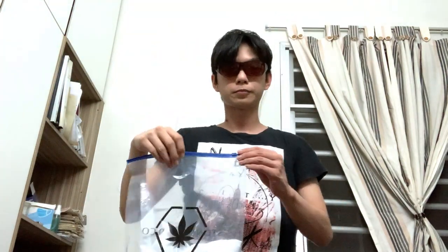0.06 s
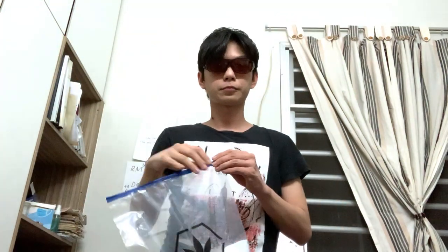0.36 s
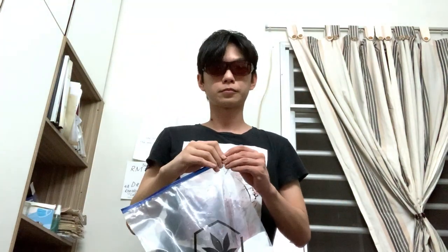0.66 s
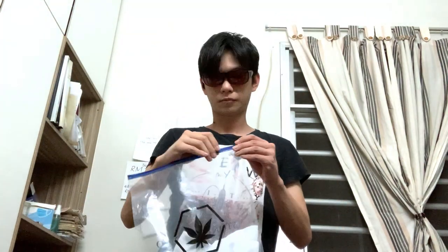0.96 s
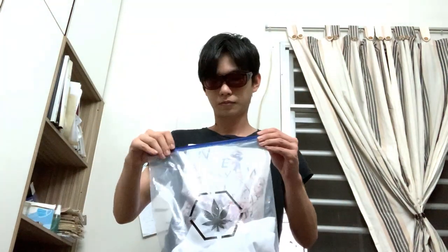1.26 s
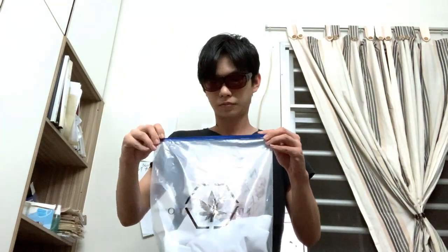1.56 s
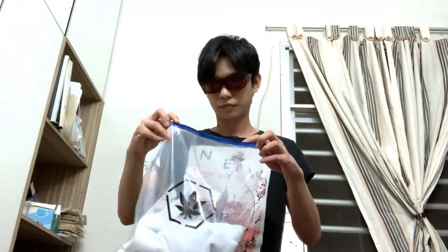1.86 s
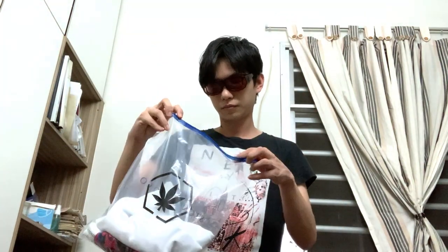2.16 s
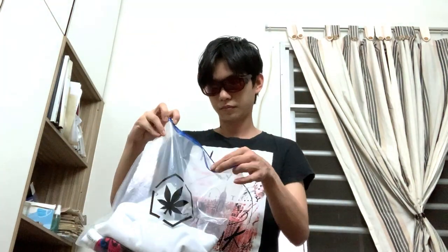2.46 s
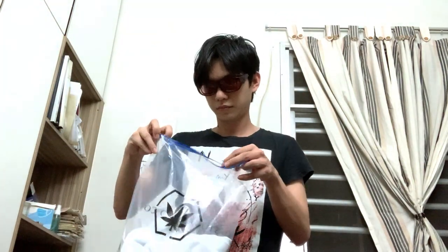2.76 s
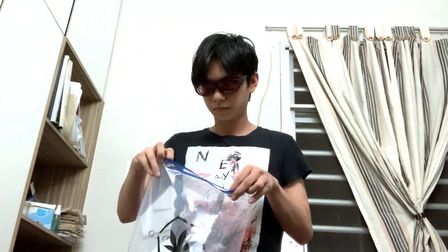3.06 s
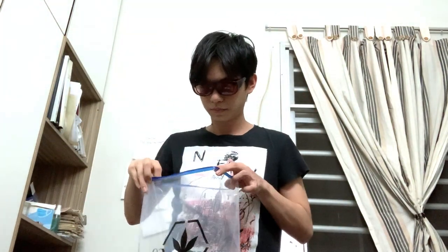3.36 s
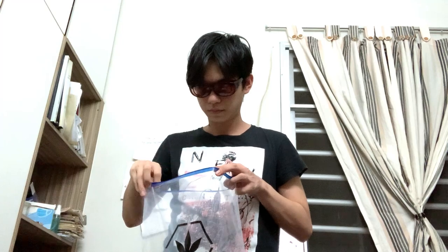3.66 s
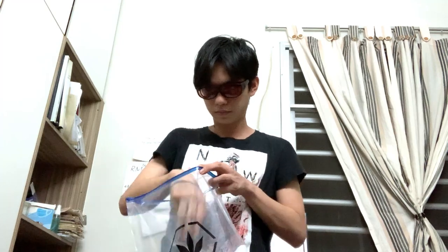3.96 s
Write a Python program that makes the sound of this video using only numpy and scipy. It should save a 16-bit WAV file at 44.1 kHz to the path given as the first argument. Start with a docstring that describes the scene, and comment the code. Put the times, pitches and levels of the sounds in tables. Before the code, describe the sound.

A large plastic zip bag crinkles close by, starting with a dull rustle and a soft puff of air. From 1 to 1.4 seconds, fingers slide along the zip with a faint hiss and two small squeaks. Scattered snaps thicken into brighter crackling from 2.4 seconds. At about 3.2 seconds the seal parts in a short, stuttering rip, followed by a few more crinkles over faint room hum.

```python
"""A large plastic zip bag, handled close to a stereo microphone in a small, quiet room.
The film crumples in bursts of tiny buckles, single creases snap, and the bag swings with a puff of air.
Fingers slide along the zip with a hiss and two squeaks; then the seal is pulled apart in quick slips,
a short, stuttering rip. Low room rumble and mains hum lie underneath."""
import sys
import numpy as np
from scipy import signal
from scipy.fft import rfft, irfft
from scipy.io import wavfile

SR = 44100
rng = np.random.default_rng(int(sys.argv[2]) if len(sys.argv) > 2 else 0)


def digitize_waveform(pressure):
    """Quantize a signal to 16-bit integers and store it at the path in sys.argv[1].

    Rows of a 2-D input are taken as channels; values are limited to [-1, 1].
    """
    field = np.atleast_2d(pressure).T
    bounded = np.clip(field, -1, 1)
    quanta = np.round(bounded * 32767).astype(np.int16)
    wavfile.write(sys.argv[1], SR, quanta)


N = 176400
TIME_S = np.arange(N) / SR
# buckling film spectrum: f/Hz, gain/dB
FILM_SPECTRUM = [(60, -18), (350, 2), (600, -0.5), (1100, 1.5), (1600, -2.5), (2100, -1), (2900, -7),
                 (3700, -2.5), (5200, -13), (6300, -9.5), (7500, -21.5), (11500, -16.5), (16000, -32.5)]


def amp(db):
    """Decibels to gain."""
    return 10 ** (np.asarray(db) / 20)


def unit_rms(x):
    """Scale to rms 1."""
    return x / np.sqrt(np.mean(x ** 2) + 1e-20)


def unit_energy(x):
    """Scale to energy 1."""
    return x / np.linalg.norm(x)


def read(points, hz):
    """Interpolate a table over log frequency."""
    f, value = np.transpose(points)
    return np.interp(np.log(hz + 1), np.log(f), value)


def fade(times_s, levels_db):
    """Gain curve over the scene, zero outside the points."""
    return amp(np.interp(TIME_S, times_s, levels_db, left=-np.inf, right=-np.inf))


def add(mix, start_s, sound):
    """Mix in a stereo sound."""
    part = mix[:, max(round(start_s * SR), 0):][:, :sound.shape[1]]
    part += sound[:, :part.shape[1]]


def bins(size=2048):
    """FFT bin frequencies in Hz."""
    return np.fft.rfftfreq(size, 1 / SR)


def causal(db):
    """Minimum-phase, unit-energy impulse response of a spectrum."""
    log_gain = np.log(amp(np.r_[db, db[-2:0:-1]]))
    spectrum = np.exp(np.conj(signal.hilbert(log_gain)))
    return unit_energy(np.fft.ifft(spectrum).real[:len(db)])


def through(x, h):
    """Convolve both channels."""
    return signal.fftconvolve(x, np.atleast_2d(h), axes=1)


def placed(x, left_lag_s=30e-6, spread_s=20e-6):
    """Stereo delay from a random spot on the bag."""
    lag = round((left_lag_s + spread_s * rng.standard_normal()) * SR)
    return np.array([np.r_[np.zeros(max(delay, 0)), x][:len(x)] for delay in (lag, -lag)])


def ring(hz, decay_s, size=400):
    """Damped sine of unit energy."""
    t = np.arange(size) / SR
    return unit_energy(np.exp(-t / decay_s) * np.sin(2 * np.pi * hz * t))


def resonate(x, hz, width_hz):
    """Resonance at a steady or gliding pitch."""
    carrier = np.exp(2j * np.pi * np.cumsum(hz * np.ones(N)) / SR)
    pole = np.exp(-np.pi * width_hz / SR)
    baseband = signal.lfilter([1], np.poly([pole, pole]), x / carrier)
    return unit_rms((carrier * baseband).real)


def grains(n, per_s, spread_db, bands=24, decay_cycles=0.74):
    """Tiny clicks of uneven size, each band from its own spot; white on average."""
    out, t = np.zeros((2, n)), np.arange(256) / SR
    for hz in np.geomspace(200, 15000, bands):
        sizes = amp(spread_db * np.minimum(rng.exponential(1, n), 3)) * rng.choice([-1, 1], n)
        clicks = sizes * (rng.random(n) < per_s / bands / SR)
        ping = np.exp(-t * hz / decay_cycles) * np.cos(2 * np.pi * hz * t)
        out += placed(unit_rms(np.convolve(clicks, ping)[:n]) * np.sqrt(hz))
    return unit_rms(out)


def diffuse(n, colour):
    """Stereo noise arriving from all sides."""
    # diffuse field: f/Hz, left-right correlation/1
    correlation = [(30, 0.96), (500, 0.15), (1100, 0.41), (2200, -0.13), (4000, 0.035), (8000, 0.025)]
    hz = bins(n)
    left, independent = rfft(rng.standard_normal((2, n)))
    c = np.clip(read(correlation, hz), -1, 1)
    right = c * left + np.sqrt(1 - c ** 2) * independent
    return unit_rms(irfft(np.array([left, right]) * amp(read(colour, hz)), n))


def background(noise_db=-55):
    """Room rumble, faint hiss and mains hum."""
    # room noise: f/Hz, relative density/dB
    noise_spectrum = [(25, -50.5), (50, -2.5), (75, -4), (170, -11), (280, -19), (1200, -34), (3000, -45),
                      (13000, -50.5), (16000, -56.5)]
    # hum tones: f/Hz, level/dB
    tones = [(59, -66.5), (194, -64.5)]
    hum = sum(amp(db) * np.sqrt(2) * np.sin(2 * np.pi * (hz * TIME_S + rng.random())) for hz, db in tones)
    return amp(noise_db) * diffuse(N, noise_spectrum) + hum


def crumple(length_s, level_db, treble_db, bass_db):
    """Film buckles in clumps; slack film sounds dull and full, taut film bright."""
    attack_s, release_s, sag_db = 0.14 * length_s, 0.016, -2.5
    clump_s, clump_db = 0.00506, 5
    bass_hz, treble_hz = 810, 6000
    t, hz = np.arange(SR // 4) / SR, bins()
    envelope = np.minimum(t / attack_s, 1) * np.exp(-np.maximum(t - length_s, 0) / release_s)
    envelope *= amp(sag_db * t / length_s)
    steps = np.clip(rng.standard_normal(200), -2, 2)
    clumps = amp(clump_db * np.interp(t / clump_s, np.arange(200), steps))
    buckles = envelope * clumps * grains(len(t), per_s=2200, spread_db=1.5)
    low_shelf = bass_db / (1 + (hz / bass_hz) ** 3)
    high_shelf = treble_db * (1 - 1 / (1 + (hz / treble_hz) ** 4))
    sound = through(buckles, causal(read(FILM_SPECTRUM, hz) + low_shelf + high_shelf))
    return amp(level_db) * unit_rms(sound) * np.sqrt(length_s * SR / sound.shape[1])


def air_puff(peak_s=0.16, half_width_s=0.06, hz=59.4, peak_db=-42.5):
    """Soft, low push of air as the bag swings."""
    envelope = np.exp(-((TIME_S - peak_s) / half_width_s) ** 2)
    return amp(peak_db) * envelope * np.sin(2 * np.pi * hz * TIME_S)


def crease_snap(level_db, ring_hz, crack_db):
    """A crease flips: scattered knocks, a short ring, a treble crack; slack creases are low and dull."""
    # knock spectrum: f/Hz, gain/dB
    knock_spectrum = [(100, -14), (900, -14.5), (6000, -11.5), (9000, -21), (16000, -44)]
    # crack spectrum: f/Hz, gain/dB
    crack_spectrum = [(2000, -32.5), (7000, 16), (12000, 15), (16000, 5.5)]
    folds_s, folds_db = 0.0027, 1.5  # neighbouring folds give way too
    ring_db, crack_trim_db, cutoff_hz = -12, -3.5, 1.26 * ring_hz
    flip_s = 76e-6 * amp(-0.34 * level_db)  # weak creases flip more slowly
    tone, hz = ring(ring_hz, decay_s=0.0014), bins()
    t = np.arange(len(tone)) / SR
    envelope = unit_rms(t * np.exp(-t / flip_s)) + amp(folds_db) * unit_rms(np.exp(-t / folds_s))
    flip = rng.standard_normal(len(t)) * envelope
    knock_db = read(knock_spectrum, hz) - 10 * np.log10(1 + (hz / cutoff_hz) ** 6)
    knock = unit_energy(np.convolve(flip, causal(knock_db)))
    ringing = unit_energy(np.convolve(flip, tone))
    knock[:len(ringing)] += amp(ring_db) * ringing
    crack = unit_energy(np.convolve(flip, causal(read(crack_spectrum, hz))))
    click = unit_energy(knock) + amp(crack_db + crack_trim_db) * crack
    return placed(click) * amp(level_db) * np.sqrt(0.002 * SR)  # level referred to 2 ms


def finger_slide(grit_db=-2.5):
    """Fingers rub along the zip and buckle the film; the zip resonates, and squeaks where they catch."""
    # friction hiss: t/s, level/dB
    hiss_levels = [(.98, -77), (1.03, -60.5), (1.09, -55.5), (1.37, -54), (1.41, -73), (1.52, -68)]
    # friction spectrum: f/Hz, gain/dB
    friction_spectrum = [(60, -16), (400, 9.5), (1000, 2), (3000, 3.5), (6300, -1), (7500, -3), (11000, 0),
                         (14000, -3), (16000, -32)]
    # zip resonance: t/s, f/Hz, level/dB
    zip_resonance = [(1.05, 5560, -66), (1.16, 6300, -56), (1.22, 5370, -74), (1.27, 4700, -53),
                     (1.31, 3700, -54), (1.39, 3280, -77)]
    # finger catches: t/s, half-width/s, f/Hz, bandwidth/Hz, level/dB
    catches = [(1.165, 0.0095, 2150, 2580, -45.5), (1.365, 0.0088, 2040, 260, -48.5)]
    rub = grains(N, per_s=30000, spread_db=5)
    buckles = grains(N, per_s=220, spread_db=5)
    friction = through(rub, causal(read(friction_spectrum, bins())))
    grit = amp(grit_db) * through(buckles, causal(read(FILM_SPECTRUM, bins())))
    hiss = (friction + grit)[:, :N] * fade(*np.transpose(hiss_levels))
    times_s, note_hz, note_db = np.transpose(zip_resonance)
    note = resonate(rub, np.interp(TIME_S, times_s, note_hz), width_hz=1050) * fade(times_s, note_db)
    squeaks = np.zeros((2, N))
    for peak_s, half_width_s, hz, width_hz, db in catches:
        envelope = amp(db) * np.exp(-((TIME_S - peak_s) / half_width_s) ** 2)
        squeaks += envelope * resonate(rub, hz, width_hz)
    return hiss + note + squeaks


def seal_rip(length_s, level_db, slips_per_s, ring_hz, jitter=0.086, spread_db=2):
    """The seal unhooks in nearly regular slips that ring the taut mouth of the bag."""
    # seal spectrum: f/Hz, gain/dB
    seal_spectrum = [(60, -24), (600, -3.5), (1100, 5), (2000, -1.5), (3000, -3.5), (16000, -2)]
    count = max(round(length_s * slips_per_s), 1)
    gaps, sizes = rng.standard_normal((2, count))
    onsets = np.cumsum(np.exp(jitter * gaps)) * SR / slips_per_s
    slips = np.bincount((onsets - onsets[0]).astype(int), amp(spread_db * sizes))
    ringing = np.convolve(slips, ring(ring_hz, decay_s=0.00026))
    sound = np.convolve(ringing, causal(read(seal_spectrum, bins())))
    return placed(unit_energy(sound)) * np.sqrt(length_s * SR) * amp(level_db)


def room(x, size=32768):
    """Near reflections from body and walls, then a tail whose treble dies first."""
    # reverberation time: f/Hz, T60/s
    t60 = [(200, 0.44), (2500, 0.36), (12000, 0.25)]
    # reflection spectrum: f/Hz, gain/dB
    colour = [(100, 5), (1500, -5), (15000, -2.5)]
    early_db, early_gap_s, early_decay_s = -1.5, 0.0007, 0.016
    tail_db, tail_rise_s = -2.5, 0.017
    hz, frames_s, spectra = signal.stft(diffuse(size, colour), SR, nperseg=256)
    decay = amp(-60 * frames_s / read(t60, hz)[:, None])
    tail = signal.istft(spectra * decay, SR, nperseg=256)[1][:, :size]
    t = np.arange(size) / SR
    tail *= np.minimum(t / tail_rise_s, 1)
    tail *= amp(tail_db) / np.linalg.norm(tail[0])
    early = diffuse(size, colour) * np.exp(-t / early_decay_s) * (t > early_gap_s)
    early *= amp(early_db) / np.linalg.norm(early[0])
    return through(x, early + tail)[:, :N]


def scene(seal_send_db=-6):
    """The bag in its room; its mouth faces the microphone, so the rip reaches the room less."""
    # crease snaps: t/s, level/dB, ring f/Hz, relative crack level before trim/dB
    snaps = [(0.1357, -35.5, 2400, -22), (0.272, -44.5, 1500, -30), (0.3179, -47, 1560, -29),
             (0.3515, -46, 2270, -18), (0.4227, -43.5, 1140, -16), (0.488, -44, 1480, 1),
             (0.83, -50, 1900, -38), (0.861, -50, 2630, -36), (0.9543, -46.5, 1760, -43),
             (1.384, -41, 1740, -26), (1.4352, -42, 2800, -21), (1.8556, -41.5, 2200, -20),
             (1.9787, -42, 1230, -36), (2.0803, -41.5, 1310, -36), (2.2878, -44.5, 2050, -13),
             (2.4025, -41.5, 1200, -32), (2.4236, -34.5, 1680, 4), (2.4372, -41, 2120, -16),
             (2.5146, -31.5, 3820, 0), (2.597, -46, 2100, -16), (2.6342, -29.5, 3420, -20),
             (2.644, -37, 1500, -5), (2.6552, -43, 1100, -16), (2.743, -43.5, 2040, -30),
             (2.778, -35, 3270, -11), (2.787, -37, 3400, -24), (2.795, -33.5, 2000, -14),
             (2.845, -34.5, 2180, -14), (2.926, -39.5, 2140, -11.5), (3.0546, -39.5, 2000, -36),
             (3.1113, -24.5, 3650, -8.5), (3.132, -42, 3530, -6), (3.2842, -31, 3940, -15),
             (3.3522, -33.5, 2130, 6), (3.5117, -42, 2830, -3.5), (3.725, -50, 1100, -45),
             (3.7705, -50.5, 1710, -22), (3.8905, -30.5, 3240, -17)]
    # film crumples: t/s, length/s, level/dB, treble shelf/dB, bass shelf/dB
    crumples = [(0.033, 0.11, -47.5, -12, 9), (0.148, 0.047, -44, -5.5, 1), (0.213, 0.14, -60, -6, 7),
                (1.794, 0.13, -57.5, -7, 12.5), (2.043, 0.05, -56.5, -17, 5), (2.266, 0.14, -59.5, -21, 6),
                (2.417, 0.032, -44, -4, -28), (2.449, 0.099, -51.5, 5.5, 3), (2.583, 0.074, -48, 5.5, 0.5),
                (2.636, 0.014, -40, 4, 3.5), (2.67, 0.034, -48.5, -3, -3), (2.774, 0.024, -42, -8.5, -1),
                (2.81, 0.08, -50.5, -10, -5), (2.864, 0.022, -42, -8.5, -20), (2.891, 0.1, -55.5, -4, 4.5),
                (3.068, 0.13, -50.5, -4, 3), (3.101, 0.048, -42, 14.5, -7.5),
                (3.228, 0.063, -35.5, 10, -0.5), (3.315, 0.018, -41.5, 7.5, -4),
                (3.355, 0.047, -40, 5, 0.5), (3.763, 0.062, -52, -8.5, 5), (3.83, 0.4, -61, -21, 12),
                (3.944, 0.065, -44.5, 2.5, 2)]
    # seal rips: t/s, length/s, level/dB, slip rate/Hz, ring f/Hz
    rips = [(3.2205, 0.012, -27.5, 730, 1280), (3.2341, 0.022, -26.5, 530, 1120),
            (3.269, 0.03, -37, 540, 1100), (3.96, 0.028, -43, 270, 1190)]
    bag, seal = finger_slide(), np.zeros((2, N))
    for start_s, *row in snaps:
        add(bag, start_s, crease_snap(*row))
    for start_s, *row in crumples:
        add(bag, start_s, crumple(*row))
    for start_s, *row in rips:
        add(seal, start_s, seal_rip(*row))
    return bag + seal + room(bag + amp(seal_send_db) * seal) + air_puff() + background()


def record(dry, cutoff_hz=15400):
    """Slightly unequal microphone ports, then a low-pass."""
    # port imbalance: f/Hz, left minus right/dB
    balance = [(50, 0.5), (400, 2.5), (2000, -1.9), (8000, -0.1)]
    tilt_db = read(balance, bins(N)) / 2
    ports = irfft(rfft(dry) * amp([tilt_db, -tilt_db]), N)
    lowpass = signal.firwin(255, cutoff_hz, window=("kaiser", 9), fs=SR)
    return signal.oaconvolve(ports, lowpass[None], "same")


dry = scene()
out = record(dry)
digitize_waveform(out)
```